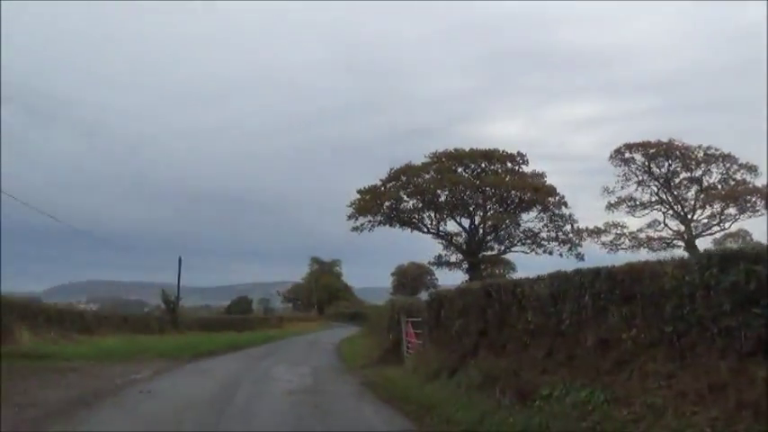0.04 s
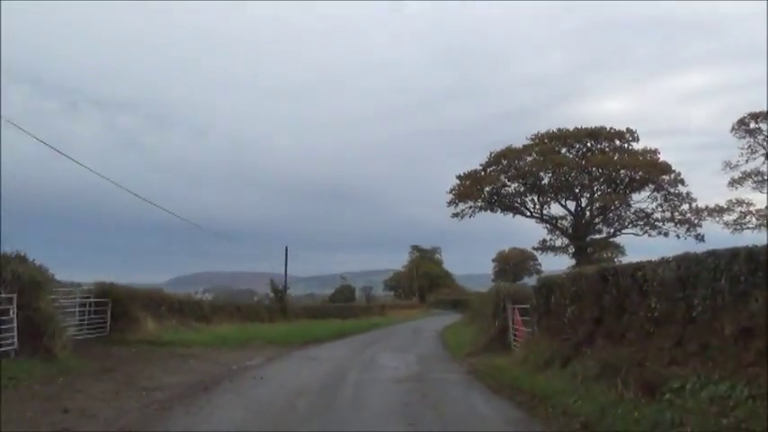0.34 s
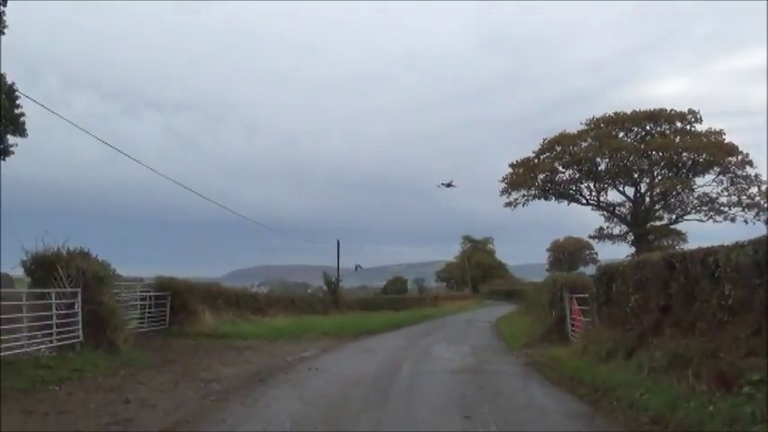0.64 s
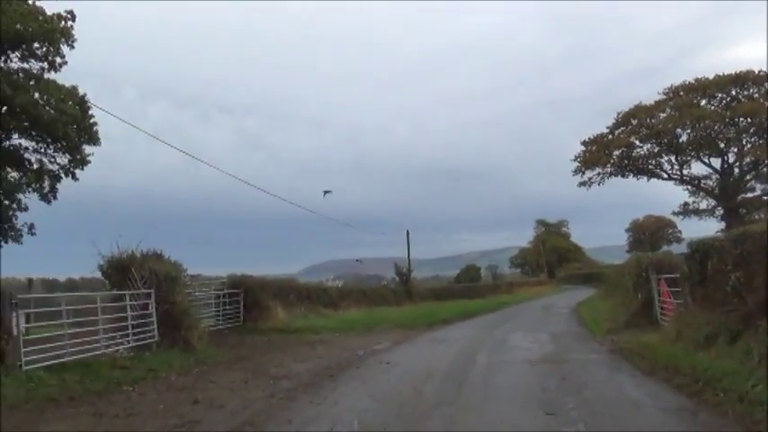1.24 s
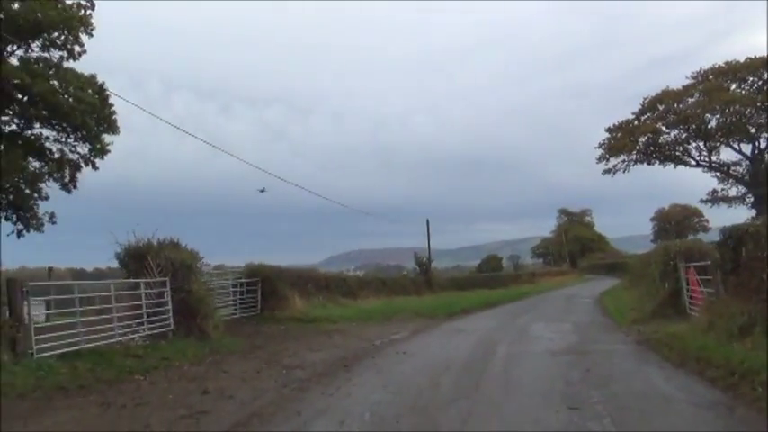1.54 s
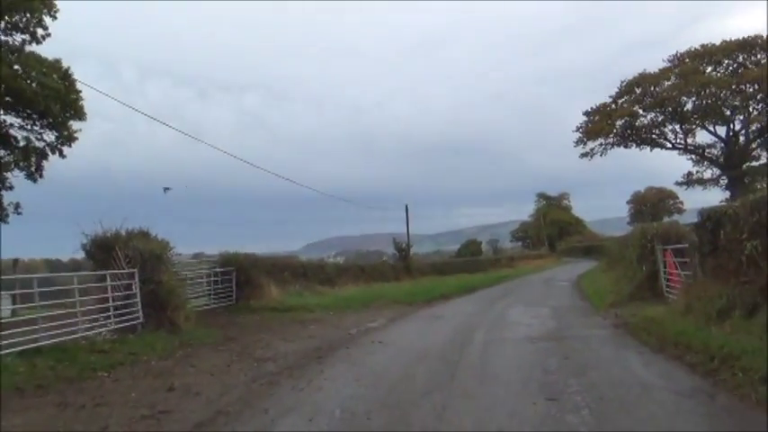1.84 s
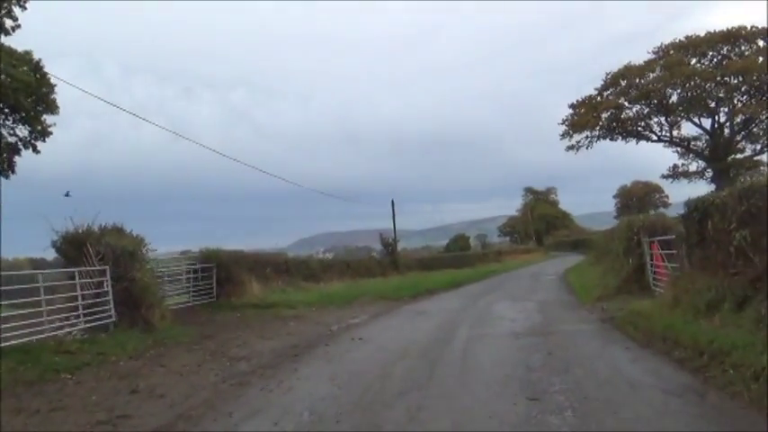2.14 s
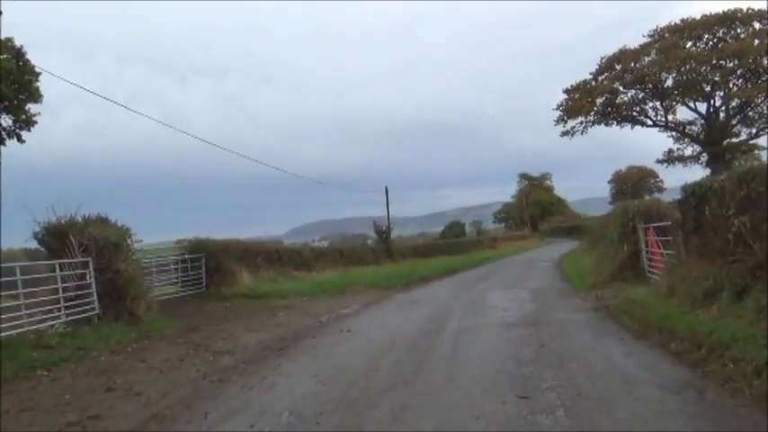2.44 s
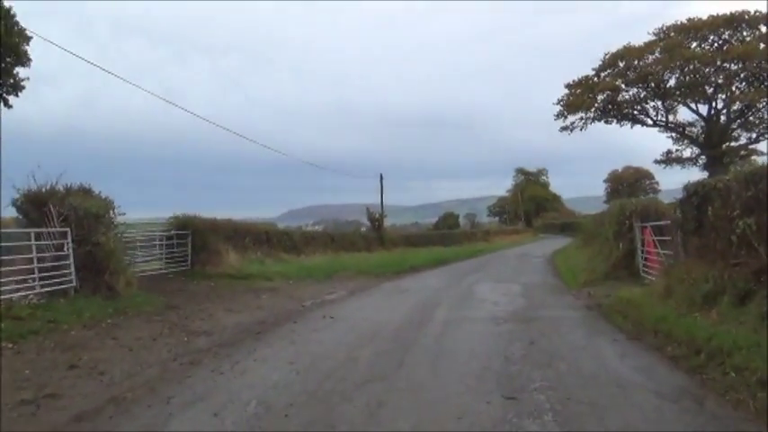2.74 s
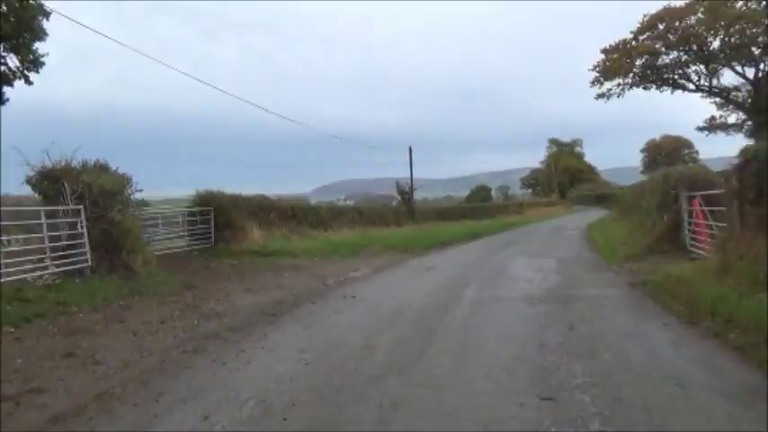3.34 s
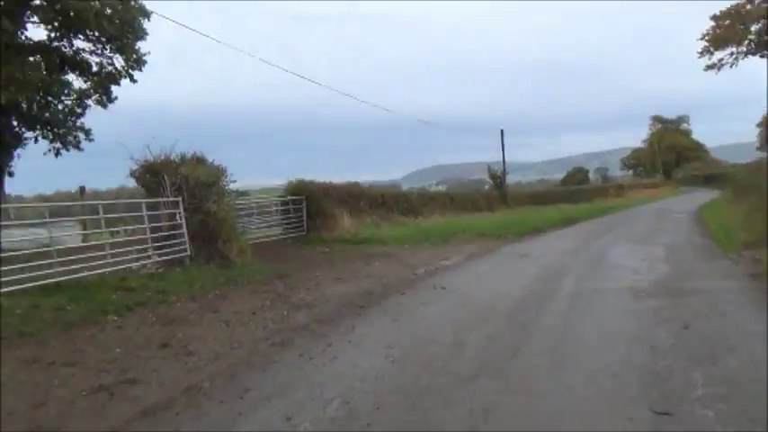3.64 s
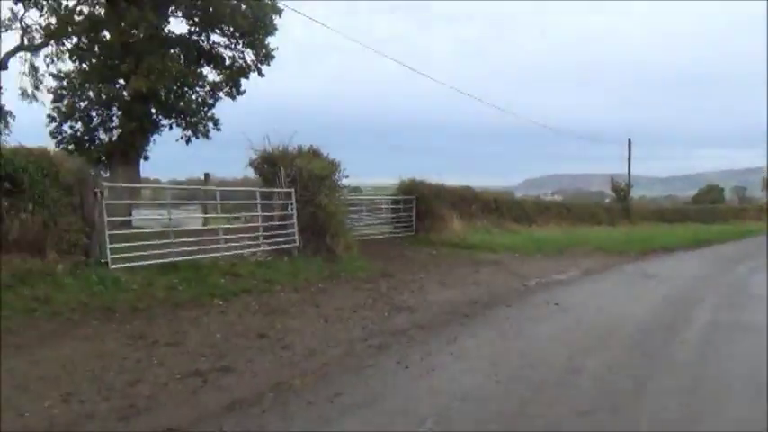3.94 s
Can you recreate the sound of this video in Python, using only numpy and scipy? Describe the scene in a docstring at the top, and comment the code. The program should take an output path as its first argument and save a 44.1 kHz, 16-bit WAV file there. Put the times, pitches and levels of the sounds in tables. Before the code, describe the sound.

A pheasant flies off, crowing in harsh, rattling two-note calls, its wings thumping at first. The calls grow duller and fainter over the fields, while feet shift and grit snaps near the microphone in a quiet outdoor hush.

```python
"""A cock pheasant flies off over the fields by a country lane, above a quiet hush and a low rumble.
From the start it crows in harsh two-note calls: a rattle chops its voice and rings its throat and beak.
Its wings thump and puff for about the first second, and soft wheezes fall between calls.
Then feet shift close by; with distance the calls grow duller and the hedges and trees answer more.
In the second half, grit snaps underfoot, there is one small knock, and the rumble dies away."""
import sys
import numpy as np
from scipy import signal
from scipy.fft import rfft, irfft
from scipy.io import wavfile

SR = 44100
rng = np.random.default_rng(int(sys.argv[2]) if len(sys.argv) > 2 else 0)


def dump_mix(stems):
    """Bounce the given channels to the path in sys.argv[1] as a 16-bit WAV at rate SR."""
    frames = np.atleast_2d(stems).T  # one column per channel
    limited = np.clip(frames, -1, 1)  # hard clip at full scale
    pcm = np.round(limited * 32767).astype(np.int16)
    wavfile.write(sys.argv[1], SR, pcm)


N = 176400
CLOCK = np.arange(N) / SR

# The tone colours of the hush and the rumble. Each row: frequency in Hz, level in dB.
HUSH_COLOUR = [(15, -40), (25, -18), (59, -1), (135, -0.5), (383, -2), (811, -2.5), (1030, 2), (1240, -5.5),
               (2850, -9.5), (3830, -10), (4260, -19), (4870, -11), (6370, -14), (9770, -13),
               (15000, -20.5)]
RUMBLE_COLOUR = [(20, -27), (48, 0), (100, -6), (250, -11), (600, -9), (1500, -34), (5000, -70)]
# How the rumble fades. Each row: time in seconds, level in dB.
RUMBLE_FADE = [(0, -40), (.6, -41.5), (1.3, -44.5), (1.9, -46.5), (2.4, -51.5), (4, -63)]

# A call is a short falling note, then a longer, nearly level one. Each row: start in seconds,
# length in seconds, rasp level in dB, tone level in dB, pitch in Hz, fall as a share of the pitch,
# loudest point as a share of the length, mid-note treble change in dB, open beak's ring in Hz,
# unevenness as a share of the rattle's speed.
CALL_NOTES = [(.005, .058, -18.5, -20.5, 1110, 0.28, 0.44, -2.5, 3690, 0.057),
              (0.086, 0.088, -14.5, -17.5, 1070, -0.071, 0.58, -1.5, 3920, 0.21),
              (0.387, .066, -19, -21, 1050, .26, 0.41, -2.5, 3830, .1),
              (0.49, 0.079, -15, -16, 1065, -0.091, 0.47, -0.5, 3900, .2),
              (.824, 0.058, -17.5, -21, 1047, .2, 0.34, 0, 3850, 0.059),
              (0.95, 0.069, -16.5, -21, 1029, 0.048, 0.58, -4, 3810, .16),
              (1.281, 0.07, -20, -23.5, 1086, 0.25, .35, -4, 3740, 0.088),
              (1.393, 0.097, -17.5, -24.5, 1070, -0.044, 0.46, -2, 3820, 0.21),
              (1.754, 0.059, -20, -28, 1068, 0.22, 0.4, -6, 3770, 0.051),
              (1.901, 0.07, -25, -28.5, 1057, -0.039, 0.41, 5, 3740, .12),
              (2.305, 0.064, -26, -33.5, 1107, .18, .35, 1, 3690, 0.037),
              (2.437, 0.075, -25.5, -39, 1043, -0.0059, 0.45, -1, 3800, .14),
              (2.851, 0.064, -29, -50, 1070, .18, .4, 6.5, 3800, 0.057),
              (2.972, 0.086, -30.5, -47.5, 1057, 0.046, 0.49, -5, 3720, .12),
              (3.400, 0.058, -35.5, -36.5, 1070, 0.2, 0.37, -12, 3730, 0.045),
              (3.519, 0.088, -35, -44.5, 1049, 0.0038, 0.28, 9, 3670, 0.11),
              (3.945, 0.072, -40, -43, 1084, 0.16, 0.17, -3, 3730, .05)]
# How far off the bird is. Each row: time in seconds, farness from 0 (near) to 1 (far).
FARNESS = [(0, 0.25), (1.45, 0.25), (1.9, 0.84), (2.5, 0.69), (4, 1)]
# The colour of the rasp, close by and far off. Each row: frequency in Hz, level in dB.
THROAT_NEAR = [(200, -40), (620, -34), (790, -4.5), (1100, 5.5), (1420, -10.5), (1630, -32), (2050, -3.5),
               (2450, -6.5), (2800, -15), (3300, -5), (3800, -1), (4300, -9), (4850, -7.5), (5400, -7),
               (6600, -7.5), (7400, -12), (9000, -10.5), (11500, -21), (15500, -39)]
THROAT_FAR = [(200, -54), (600, -15), (790, -2), (1080, 4.5), (1380, -6), (1800, 6), (2280, -11),
              (2700, -1.5), (3300, -5), (3800, -7.5), (4220, -0.5), (4700, 2.5), (5400, -15.5),
              (7200, -35.5), (9300, -22.5), (15500, -57)]
# The voice's overtones, from the octave up. Each entry: level in dB before distance and fading.
OVERTONES_DB = [1, -8.5, -9, -7, -9.5, -20, -20, -11]

# How long the echo lasts. Each row: frequency in Hz, seconds to fade by 60 dB.
ECHO_FADE = [(200, 0.36), (1100, 0.77), (2500, 0.73), (4000, 0.71), (6000, 0.73), (12000, 0.94)]
# The colour of the echo. Each row: frequency in Hz, level in dB.
ECHO_COLOUR = [(200, 4), (800, 3), (1100, -7), (1500, -1), (3400, -0.5), (3780, -2.5), (4080, 6), (4450, 1),
               (8000, 4.5), (15000, -1.5)]

# Wing beats. Each row: time in seconds, level in dB.
WING_BEATS = [(0.025, -24), (.110, -20.5), (.195, -22), (.280, -21.5), (0.367, -27), (0.45, -24.5),
              (.536, -26), (.621, -19.5), (.705, -21.5), (0.792, -26.5), (.875, -30.5), (1.214, -28.5)]
# Soft low thuds: wing puffs in the first second, footfalls later. Each row: time in seconds, level in dB.
LOW_THUDS = [(.115, -30), (.445, -33), (1.335, -33), (1.418, -47), (1.501, -45.5), (1.73, -36.5),
             (2.236, -41.5), (2.394, -39.5), (2.85, -33.5), (2.999, -36.5), (3.465, -37), (3.56, -40.5),
             (3.626, -45.5)]
# The colours of a wing beat's puff and of a low thud. Each row: frequency in Hz, level in dB.
PUFF_COLOUR = [(20, -16), (50, 6), (130, 5.5), (300, -5), (800, -22), (3000, -67)]
THUD_COLOUR = [(30, -17), (100, -8), (160, -3.5), (300, -14.5), (700, -16.5), (3000, -41)]

# Soft notes between the calls. Each row: start in seconds, length in seconds, breath level in dB,
# tone level in dB, pitch in Hz, whistle in Hz.
WHEEZY_NOTES = [(0.278, 0.059, -38, -32, 838, 3860), (0.324, 0.078, -29, -49, 838, 4810),
                (.700, 0.033, -46, -32, 903, 4040), (1.088, 0.044, -33.5, -30, 847, 4030),
                (1.109, 0.078, -28.5, -52, 800, 3824), (1.656, 0.073, -33.5, -50, 894, 3610),
                (3.101, 0.083, -38.5, -44, 1031, 3780), (3.623, 0.046, -36.5, -48, 1044, 3600),
                (3.759, .1, -38.5, -49, 1035, 3750)]
# The colour of breath in the throat. Each row: frequency in Hz, level in dB.
BREATH_COLOUR = [(500, -34), (1100, -11.5), (1800, -4.5), (2400, -13.5), (3400, -7.5), (3800, -3),
                 (4250, -11), (4700, 6.5), (5400, -12), (8000, -21), (15000, -26)]

# Snaps of grit. Each row: start in seconds, level in dB, low edge of the sound in Hz.
GRIT_SNAPS = [(2.265, -23.5, 2650), (2.569, -38, 900), (2.665, -26.5, 5900), (2.704, -34, 1183),
              (2.815, -24, 500), (2.843, -31, 900), (2.867, -27.5, 6000), (2.894, -28, 5950),
              (2.923, -30.5, 5000), (3.456, -28, 3440), (3.508, -32.5, 4940)]


def amp(db):
    """Turns decibels into a number to multiply by."""
    return 10 ** (np.asarray(db) / 20)


def unit(x):
    """Scales a sound to an average (rms) level of 1."""
    return x / np.sqrt(np.mean(abs(x) ** 2) + 1e-20)


def read(points, hz):
    """Looks up a frequency in a table, sliding between rows on a musical (log) scale."""
    f, value = np.transpose(points)
    return np.interp(np.log(hz + 1), np.log(f + 1), value)


def colour(x, points):
    """Shapes a sound's lows and highs by rows of frequency in Hz, level in dB."""
    size = x.shape[-1]
    gain = amp(read(points, np.fft.rfftfreq(2 * size, 1 / SR)))
    return irfft(rfft(x, 2 * size) * gain)[..., :size]


def add(mix, start, sound):
    """Mixes a sound in at a start time in seconds."""
    part = mix[max(round(start * SR), 0):][:len(sound)]
    part += sound[:len(part)]


def wobble(size, rate_hz):
    """A random wandering curve, roughly 1 either side of zero."""
    return np.interp(np.arange(size) * rate_hz / SR, np.arange(4096), rng.standard_normal(4096))


def hiss(size):
    """A short stretch of white noise."""
    return rng.standard_normal(16384)[:size]


def spread(mid, side, width):
    """Makes left and right from a shared part and an opposed part."""
    side = width * colour(side, [(30, -45), (150, 0.5), (4500, 3.5), (8000, -4.5), (13000, -31)])
    return np.array([mid + side, mid - side])


def ring(x, hz, width_hz):
    """Makes a sound ring at a steady or moving frequency; two passes make the peak steep."""
    turn = np.exp(2j * np.pi * np.cumsum(hz * np.ones(len(x))) / SR)
    feedback = np.exp(-np.pi * width_hz / SR)
    for _ in range(2):
        x = 2 * (turn * signal.lfilter([1 - feedback], [1, -feedback], x / turn)).real
    return unit(x)


def scatter(x):
    """Smears each pulse over a millisecond or two and gives each note its own colour."""
    spectrum = rfft(x)
    at = np.linspace(0, 63, len(spectrum))
    ripple_db = 2.5 * np.interp(at, np.arange(64), rng.standard_normal(64))
    smear_radians = 2.05 * np.interp(at, np.arange(64), rng.standard_normal(64))
    return irfft(spectrum * amp(ripple_db) * np.exp(1j * smear_radians), len(x))


def swell(progress, peak):
    """Rises to its loudest point, then dies away, as progress runs from 0 to 1."""
    rise = abs(np.sin(np.pi / 2 * progress / peak)) ** 0.41
    fall = abs(np.cos(np.pi / 2 * (progress - peak) / (1 - peak))) ** 0.86
    return np.where(progress < peak, rise, fall)


def thud(width_s, points):
    """A bell-shaped puff of dull noise, loudest 0.05 seconds in."""
    t = np.arange(-.05, .05, 1 / SR)
    return np.exp(-(t / width_s) ** 2 / 2) * unit(colour(hiss(len(t)), points))


def outdoor_air():
    """A steady hush, and a low rumble that flutters and dies away."""
    hush = unit(colour(spread(*rng.standard_normal((2, N)), width=0.45), HUSH_COLOUR))
    hush_db = -42 + 0.34 * wobble(N, rate_hz=21)
    rumble = unit(colour(spread(*rng.standard_normal((2, N)), width=0.23), RUMBLE_COLOUR))
    rumble_db = np.interp(CLOCK, *np.transpose(RUMBLE_FADE)) + 2.5 * wobble(N, rate_hz=40)
    return hush * amp(hush_db) + rumble * amp(rumble_db)


def rasp(t, rattle_cycles, far, beak_hz):
    """Each turn of the rattle gives a pulse and a burst of hiss that ring the throat and the beak."""
    pulses = unit(np.diff(np.floor(rattle_cycles), prepend=0))
    bursts = unit(np.exp(-(rattle_cycles % 1) / 0.38)) * hiss(len(t))
    drive = scatter(pulses + 0.67 * bursts)
    throat = unit((1 - far) * unit(colour(drive, THROAT_NEAR)) + far * unit(colour(drive, THROAT_FAR)))
    opening = 1 - 0.077 * np.exp(-t / 0.0094)  # the ring rises as the beak opens
    beak = amp(-3.5) * ring(drive, beak_hz * opening, width_hz=480)
    upper_ring = amp(-12.5) * ring(drive, hz=4808, width_hz=480)
    return unit(throat + beak + upper_ring)


def reedy_tone(hz, rattle_cycles, far, progress):
    """The pitched part of the voice, bent and chopped by the rattle."""
    rattle = np.cos(2 * np.pi * rattle_cycles)
    shaky_hz = hz * (1 + 0.023 * wobble(len(hz), rate_hz=347))
    phase = 2 * np.pi * np.cumsum(shaky_hz) / SR + 0.2 * rattle
    overtones = sum(amp(db) * np.sin(k * phase + 2 * np.pi * rng.random())
                    for k, db in enumerate(OVERTONES_DB, 2))
    dulling_db = -13.5 * far - 15 * progress  # overtones fade with distance and through the note
    return unit((np.sin(phase) + amp(dulling_db) * overtones) * (1 + 0.2 * rattle))


def call_note(start, length, rasp_db, tone_db, pitch_hz, fall, peak, treble_db, beak_hz, unevenness):
    """One harsh note: a tone near 1000 Hz and a rasp, both chopped by a rattle a third as fast."""
    t = np.arange(0, length, 1 / SR)
    progress = t / length
    far = np.interp(start, *np.transpose(FARNESS))
    scoop = .1 * np.exp(-t / .005)  # the pitch slides up at the start
    hz = pitch_hz * (1 + fall * (.5 - progress) - scoop)
    rattle_hz = hz * .333 * (1 + unevenness * wobble(len(t), rate_hz=400))
    rattle_cycles = np.cumsum(rattle_hz) / SR
    loudness = swell(progress, peak)
    push = loudness ** 0.47  # the rasp needs more push than the tone
    voice = amp(rasp_db) * push * rasp(t, rattle_cycles, far, beak_hz)
    voice += amp(tone_db) * reedy_tone(hz, rattle_cycles, far, progress)
    treble = colour(voice, [(5000, -34), (8000, 0)])
    brighten_db = treble_db + 13.5 * (progress - .5)  # brighter as the beak opens
    return loudness * (voice + (amp(brighten_db) - 1) * treble)


def field_echo(voice):
    """Hedges, trees and ground scatter the calls: quick echoes, and a tail that gains with distance."""
    specks = rng.standard_normal((2, SR)) * (rng.random((2, SR)) < .05)
    hz, t, bands = signal.stft(specks, SR, nperseg=256)
    bands = bands * amp(read(ECHO_COLOUR, hz)[:, None] - 60 * t / read(ECHO_FADE, hz)[:, None])
    tail = spread(*signal.istft(bands, SR, nperseg=256)[1], width=0.37)
    tail /= np.linalg.norm(tail[0])
    tail_db = -8 + 6 * np.interp(CLOCK, *np.transpose(FARNESS))
    quick = rng.standard_normal((2, 2048)) * np.exp(-CLOCK[:2048] / 0.0027)
    quick /= np.linalg.norm(quick[0])
    late = signal.fftconvolve((voice * amp(tail_db))[None], tail, axes=1)[:, :N]
    early = signal.fftconvolve(voice[None], quick, axes=1)[:, :N]
    return late + amp(-17) * early


def wings():
    """Each downstroke pushes a puff of air and ends in a short hollow thump."""
    thump_hz, thump_s, puff_lead_s = 445, 0.0023, 0.00605
    out, t = np.zeros(N), np.arange(-.02, .02, 1 / SR)
    for time, db in WING_BEATS:
        thump = np.exp(-(t / thump_s) ** 2 / 2) * np.cos(2 * np.pi * (thump_hz * t + rng.random()))
        add(out, time + t[0], amp(db) * thump)
        puff = thud(width_s=0.0069, points=PUFF_COLOUR)
        add(out, time - puff_lead_s - .05, amp(db - 16.5) * puff)
    return out


def low_thuds():
    """Soft low thuds: air pushed by the wings in the first second, soles on the road later."""
    out = np.zeros(N)
    for time, db in LOW_THUDS:
        add(out, time - .05, amp(db) * thud(width_s=0.011, points=THUD_COLOUR))
    return out


def wheezy_note(length, breath_db, tone_db, pitch_hz, whistle_hz):
    """A weak, sagging tone, with air whistling through the throat."""
    progress = np.arange(0, length, 1 / SR) / length
    size = len(progress)
    hz = pitch_hz * (1 + 0.22 * (.5 - progress) + 0.063 * wobble(size, rate_hz=376))
    tone = np.sin(2 * np.pi * np.cumsum(hz) / SR)
    breath = unit(colour(hiss(size), BREATH_COLOUR)) + 1.3 * ring(hiss(size), whistle_hz, width_hz=200)
    return swell(progress, peak=0.53) * (amp(breath_db) * unit(breath) + amp(tone_db) * unit(tone))


def grit():
    """Grit snaps underfoot in tiny bursts of bright noise."""
    out, t = np.zeros(N), CLOCK[:2048]
    for start, db, low_hz in GRIT_SNAPS:
        snap = colour(hiss(len(t)), [(low_hz / 2, -25), (low_hz, 0), (11400, -7), (16000, -18)])
        add(out, start, amp(db) * unit(snap) * np.exp(-t / 0.0019))
    return out


def knock(first_hz=1310, last_hz=250, fade_s=0.0061):
    """A small knock whose pitch drops as it fades."""
    fade = np.exp(-CLOCK[:2048] / fade_s)
    hz = last_hz + (first_hz - last_hz) * fade
    return fade * np.sin(2 * np.pi * np.cumsum(hz) / SR)


def scene():
    """The bird a little to the left; low thuds, grit and the knock in the middle; air all around."""
    voice = np.zeros(N)
    for row in CALL_NOTES:
        add(voice, row[0], call_note(*row))
    for start, *row in WHEEZY_NOTES:
        add(voice, start, wheezy_note(*row))
    bird = (voice + field_echo(voice) + wings()) * amp([[0.8], [-0.8]])
    middle = low_thuds() + grit()
    add(middle, start=2.841, sound=amp(-25) * knock())
    return bird + middle + outdoor_air()


def record(dry):
    """Adds a thin, steady, very high whine and cuts everything above 16000 Hz."""
    whine = amp(-58.5) * unit(np.sin(2 * np.pi * 15625 * CLOCK))
    top_cut = signal.firwin(511, 16000, window=("kaiser", 9), fs=SR)
    return signal.oaconvolve(dry + whine, top_cut[None], "same")


dry = scene()
out = record(dry)
dump_mix(out)
```